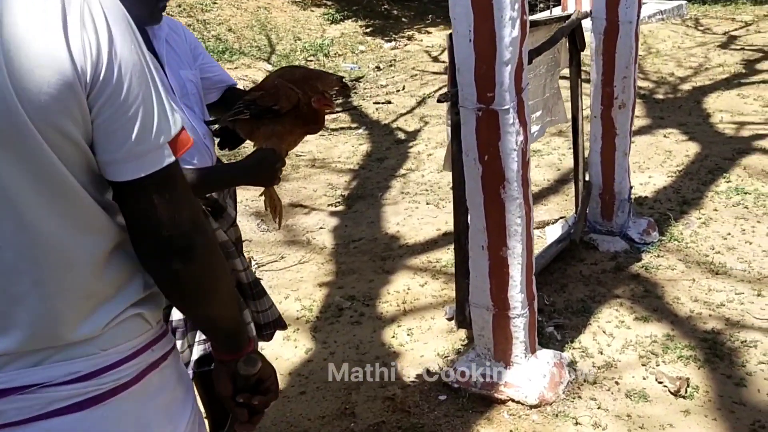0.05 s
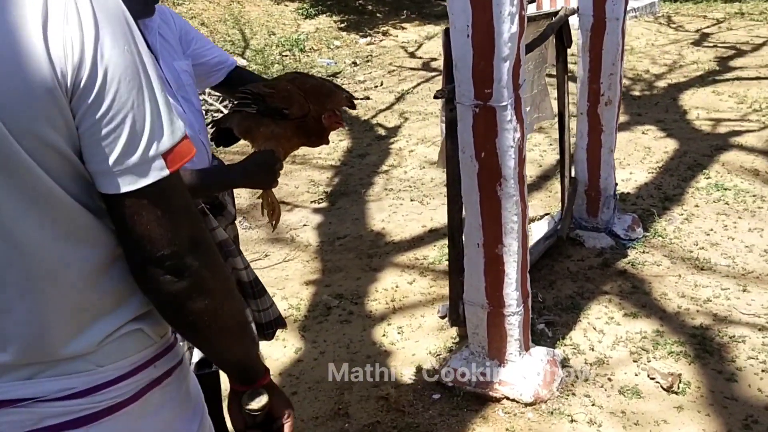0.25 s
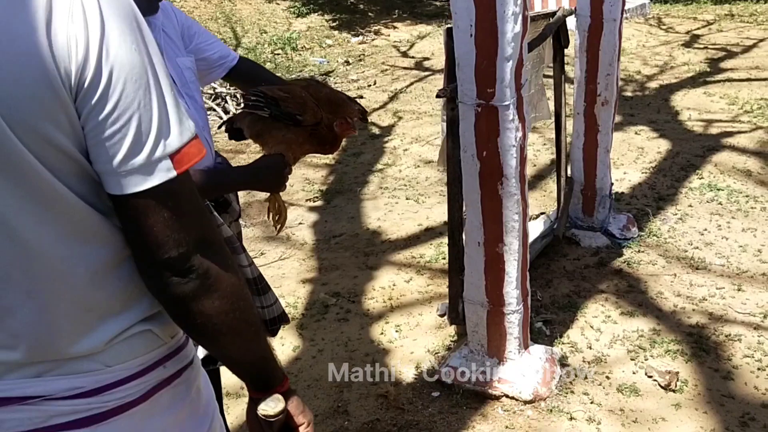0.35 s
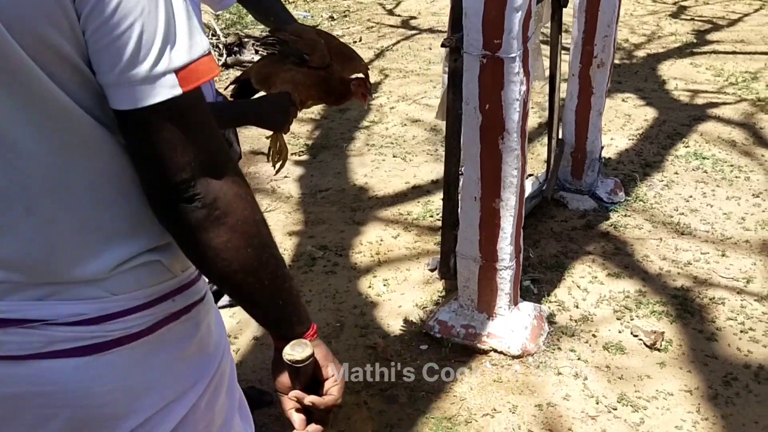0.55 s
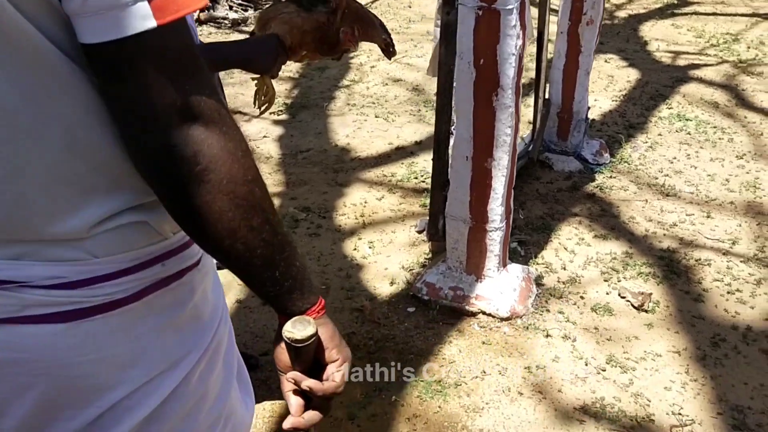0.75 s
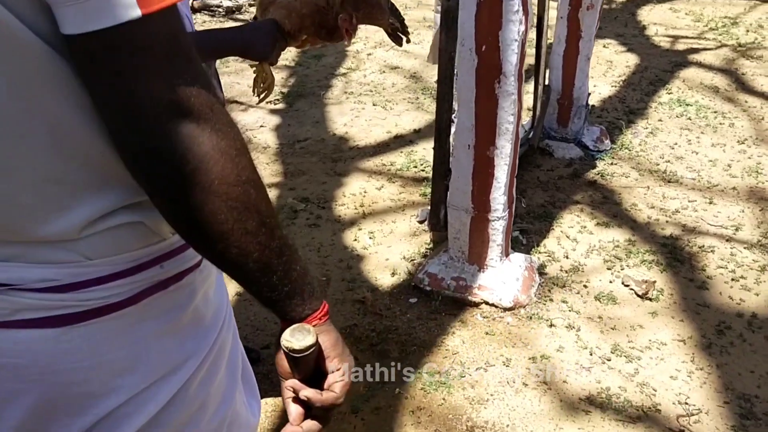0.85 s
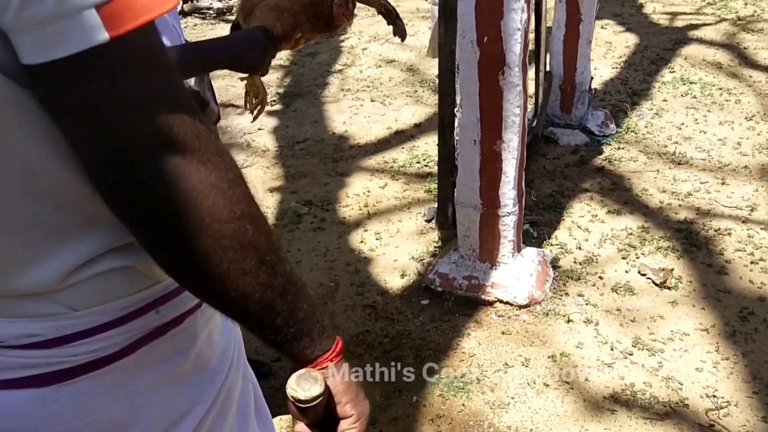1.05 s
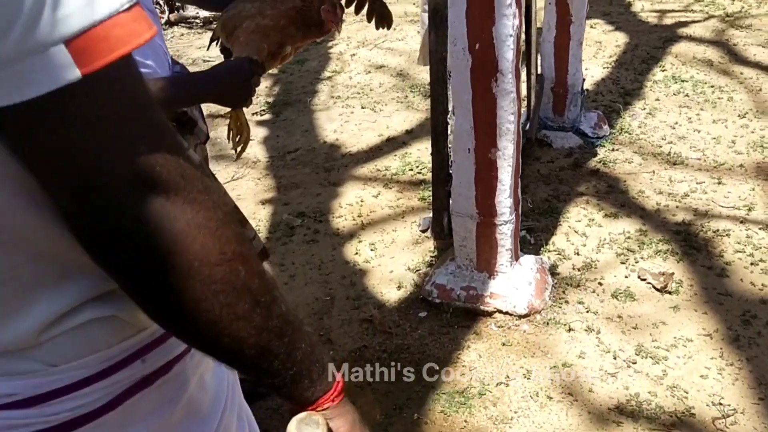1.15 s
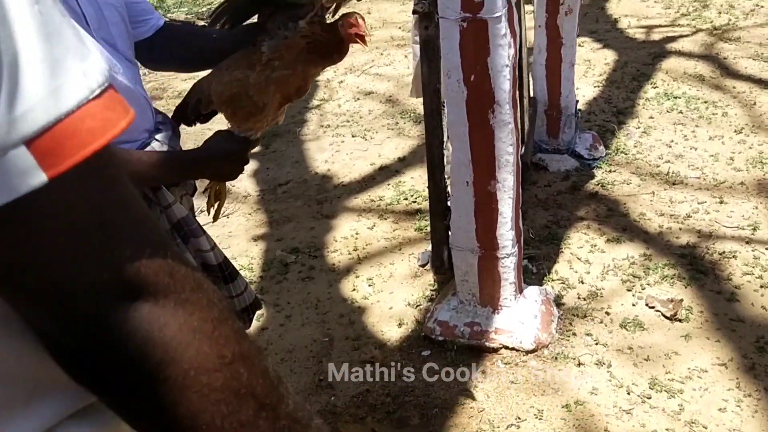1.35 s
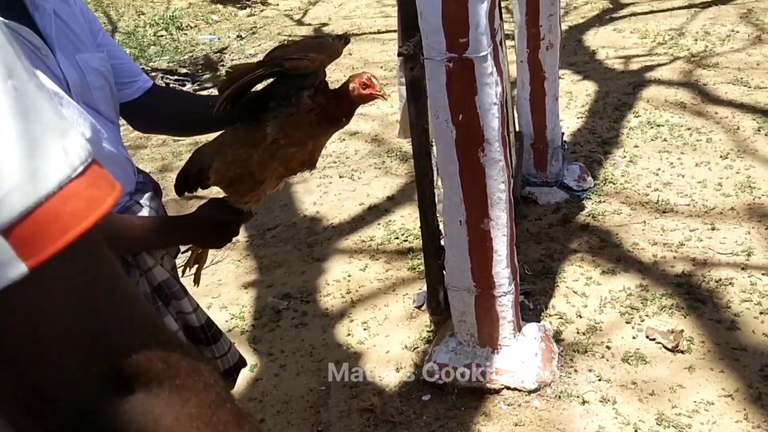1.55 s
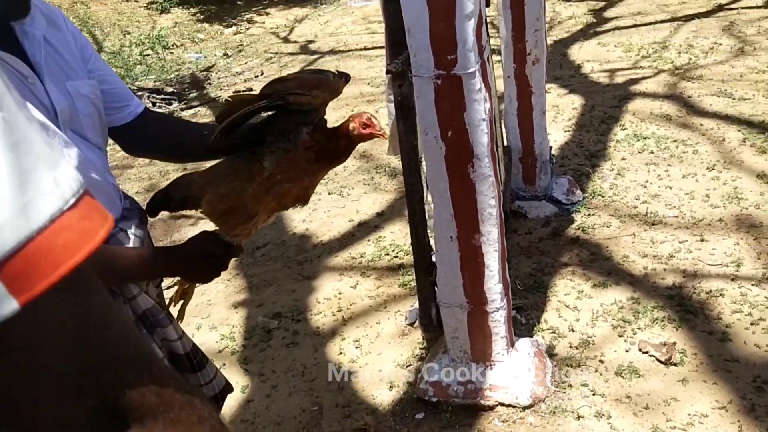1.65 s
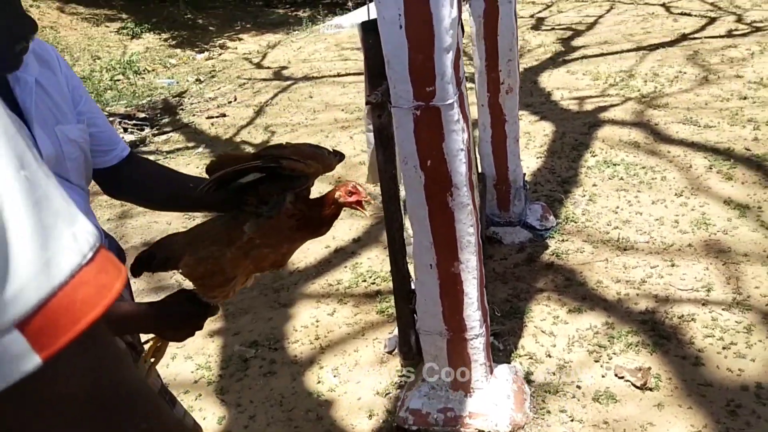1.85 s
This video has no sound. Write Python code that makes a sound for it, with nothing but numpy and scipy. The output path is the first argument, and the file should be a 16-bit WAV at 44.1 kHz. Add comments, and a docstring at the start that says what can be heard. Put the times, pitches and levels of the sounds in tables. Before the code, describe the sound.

A hen squawks loudly four times in quick succession, each harsh squeal dropping into a lower croak, then starts a fifth. She is close by in a quiet yard with a slight echo, and a faint rooster sounds far off.

```python
"""A hen squawking in a yard.

Held by the legs, a hen squawks four times and starts a fifth. The two sides of her syrinx beat
against each other in a harsh squeal, then fall into one lower croak as the beak closes.
Walls and trees return a faint echo over quiet outdoor air; a far rooster holds a note in the last pause."""
import sys
import numpy as np
from scipy import signal
from scipy.fft import rfft, irfft, next_fast_len
from scipy.io import wavfile
from scipy.ndimage import uniform_filter1d

SR = 44100
rng = np.random.default_rng(int(sys.argv[2]) if len(sys.argv) > 2 else 0)


def dump(signal):
    """Clip the signal to [-1, 1] and save it as 16-bit WAV at the path in sys.argv[1]."""
    limited = np.clip(np.atleast_2d(signal).T, -1, 1)
    pcm = np.round(limited * 32767).astype(np.int16)
    wavfile.write(sys.argv[1], SR, pcm)


N = 83790
BAND_EDGE_HZ = 15500


def amp(db):
    """Amplitude ratio of a level in decibels."""
    return 10 ** (np.asarray(db) / 20)


def unit_rms(x):
    """Normalisation to an rms of 1."""
    return x / np.sqrt(np.mean(x ** 2) + 1e-20)


def steadied(x):
    """Division by the running rms, which flattens the envelope."""
    return x / np.sqrt(abs(uniform_filter1d(x ** 2, size=800)) + 1e-12)


def at_hz(points, hz):
    """Interpolation on a logarithmic frequency axis."""
    f, value = np.transpose(points)
    return np.interp(np.log(hz + 1), np.log(f + 1), value)


def follow(rows, at):
    """Linear interpolation of a table's other columns along its first."""
    axis, *columns = np.transpose(rows)
    return [np.interp(at, axis, column) for column in columns]


def filtered(x, gain):
    """Linear filtering: the spectrum is multiplied by gain(f)."""
    size = next_fast_len(x.shape[-1] + 4096)
    return irfft(rfft(x, size) * gain(np.fft.rfftfreq(size, 1 / SR)), size)[..., :x.shape[-1]]


def coloured(x, points):
    """Spectral shaping by points of f/Hz, gain/dB."""
    return filtered(x, lambda f: amp(at_hz(points, f)))


def wander(size, hz):
    """Random fluctuation of rms 1, mostly slower than hz."""
    noise = rng.standard_normal(size)
    return unit_rms(filtered(noise, lambda f: 1 / (1 + (f / hz) ** 2) ** 2 * f / (f + hz / 10)))


def add(mix, start_s, sound):
    """Superposition of a sound on the mix."""
    part = mix[max(round(start_s * SR), 0):][:len(sound)]
    part += sound[:len(part)]


def resonate(x, hz, width_hz):
    """A damped resonator of unit peak gain whose centre frequency may glide."""
    carrier = np.exp(2j * np.pi * np.cumsum(hz * np.ones(len(x))) / SR)
    pole = np.exp(-np.pi * width_hz / SR)
    return 2 * (carrier * signal.lfilter([1 - pole], [1, -pole], x / carrier)).real


def outdoor_air(correlation=0.55):
    """Ambient noise, partly coherent between the channels, drifts slowly in level."""
    # background spectrum: f/Hz, relative density level/dB
    spectrum = [(20, -17), (85, 2), (300, -2), (650, 5), (4200, 0.5), (6000, -14.5), (15000, -19)]
    left, independent = coloured(rng.standard_normal((2, N)), spectrum)
    right = correlation * left + np.sqrt(1 - correlation ** 2) * independent
    return amp(-53 + 1.27 * wander(N, 2.5)) * unit_rms(np.array([left, right]))


def reverberation(x, t60_points):
    """Convolution with sparse random reflections; each band decays exponentially at its own rate."""
    taps = rng.standard_normal((2, SR)) * (rng.random((2, SR)) < .1)
    taps *= np.arange(SR) > SR // 400  # the first reflection takes 2.5 ms
    hz, t, bands = signal.stft(taps, SR, nperseg=256)
    decay = amp(-60 * t / at_hz(t60_points, hz)[:, None])
    response = signal.istft(bands * decay, SR, nperseg=256)[1]
    return signal.fftconvolve(x[None], unit_rms(response) / np.sqrt(response.shape[1]), axes=1)


def yard_echo(x):
    """Early reflections off ground and posts precede the faint reverberation from walls and trees."""
    # reverberation time: f/Hz, T60/s
    decay_times = [(300, .6), (1800, .87), (15000, .4)]
    # colour of the late echo: f/Hz, relative gain/dB
    colour = [(200, -11), (700, -2), (3500, -3), (6000, 5.5)]
    early = filtered(reverberation(x, [(1, .07)]), lambda f: f / np.hypot(f, 700))
    late = coloured(reverberation(x, decay_times), colour)
    return amp(-5) * early + amp(-24) * late


def membrane(phase, hz, tilt, count, offset=0):
    """Periodic vibration: harmonic k has amplitude k ** -tilt and is shifted in phase by offset."""
    return unit_rms(sum(k ** -tilt * (k * hz < BAND_EDGE_HZ) * np.cos(k * phase + offset)
                        for k in range(1, count + 1)))


def squeal(low_phase, high_phase, high_hz, coupling, rasp, throat):
    """Nonlinear coupling adds combination tones to the high side; the throat resonance filters them."""
    # spectral envelope: f/Hz, relative gain/dB
    envelope = [(100, -57), (500, -44), (720, 3), (1000, 10), (1350, 1), (1900, 9), (2250, 4.5),
                (2700, 1.5), (3400, 13.5), (3750, 6), (4200, 4), (4900, -7), (5900, -19.5), (7100, -11.5),
                (9500, -24.5), (12000, -28.5), (15000, -24.5)]
    tone, difference_tones, sum_tones = (
        membrane(high_phase, high_hz, tilt=0.061, count=12, offset=shift)
        for shift in (0, -low_phase, low_phase))
    source = coloured(tone + coupling * (1.33 * difference_tones + 0.36 * sum_tones) + rasp, envelope)
    resonant = resonate(resonate(source, *throat), *throat)
    return steadied(resonant + amp(-12) * source)


def croak(pulses, beak_hz, ring_db, opening):
    """Source and filter: the low side's pulses excite the beak resonance and grow dull as it shuts."""
    # spectral envelopes with the beak open and shut: f/Hz, relative gain/dB
    open_envelope = [(100, -53), (430, -74), (620, -12), (850, 5.5), (1250, -6.5), (1850, -1.5),
                     (2300, -1.5), (3600, -0.5), (4200, -3.5), (4800, -5.5), (5900, -24), (7100, -15),
                     (9500, -25), (12000, -34.5), (15000, -32)]
    shut_envelope = [(100, -63), (280, -7.5), (480, -13.5), (950, -2), (1500, 6.5), (2300, -14.5),
                     (4400, -12), (5900, -41), (7300, -30), (15000, -50)]
    ringing = pulses + amp(ring_db) * resonate(pulses, beak_hz, width_hz=390)
    bright, dull = coloured(ringing, open_envelope), coloured(ringing, shut_envelope)
    return steadied(opening * bright + (1 - opening) * dull)


def squawk(effort, syrinx, beak, throat):
    """Biphonation: two membranes vibrate at separate pitches, the high squealing, the low croaking."""
    jitter_hz, tremor_hz = 210, 108
    beak_shut_hz, beak_open_hz, low_cut_hz = 1108, 1828, 397
    t = np.arange(effort[0][0], effort[-1][0], 1 / SR)
    size = len(t)
    level_db, = follow(effort, t)
    low_hz, high_hz, high_share, rough = follow(syrinx, t)
    high_share, rough = np.clip(high_share, 0, .995), np.clip(rough, 0, 1)
    low_share = 1 - high_share
    beak_hz, ring_db = follow(beak, t)
    opening = np.clip((beak_hz - beak_shut_hz) / (beak_open_hz - beak_shut_hz), 0, 1)

    # Roughness sets pitch jitter, amplitude shimmer and air noise pulsed by the low side.
    low_phase = 2 * np.pi * np.cumsum(low_hz * (1 + 0.115 * rough * wander(size, jitter_hz))) / SR
    high_phase = 2 * np.pi * np.cumsum(high_hz * (1 + 0.058 * rough * wander(size, jitter_hz))) / SR
    shimmer = 1 + .35 * rough * wander(size, 2 * jitter_hz)
    rasp = amp(-6) * rough * unit_rms((1 + np.cos(low_phase)) * rng.standard_normal(size))

    coupling = np.sqrt(low_share) * shimmer
    high_voice = squeal(low_phase, high_phase, high_hz, coupling, rasp, throat)
    pulses = shimmer * membrane(low_phase, low_hz, tilt=0.083, count=28) + rasp
    low_voice = croak(pulses, beak_hz, ring_db, opening)
    voice = steadied(high_share * high_voice + low_share ** 1.72 * low_voice)
    tremor_db = (1.4 + 1.5 * (1 - opening)) * rough * wander(size, tremor_hz)
    voice *= amp(level_db - low_share + tremor_db)  # the croak is 1 dB softer than the squeal

    # The low side's fundamental saturates as effort grows.
    fundamental_gain = np.sqrt(low_share * opening) / (amp(-level_db - 4.5) + amp(30))
    flutter = 1 + 0.97 * rough * wander(size, tremor_hz)
    voice += fundamental_gain * flutter * np.sin(low_phase)
    # A small body radiates little bass.
    return amp(2.5) * filtered(voice, lambda f: f ** 4 / (f ** 4 + low_cut_hz ** 4))


def direct_path(x):
    """The direct sound reaches two receivers with level and phase differences that vary with frequency."""
    # level difference: f/Hz, left minus right/dB
    balance = [(300, 2), (700, -6), (1000, -1), (1300, -5), (1850, -5), (2400, 4), (3100, 12), (3550, 5),
               (4100, 11), (5200, 3), (6400, -14.5), (10000, -16), (13000, 0.5)]
    # phase difference: f/Hz, left minus right/rad
    lead = [(0, 0), (900, -.6), (1350, -2.2), (2400, -.6), (3300, -3.6), (7500, -11.3), (16000, -25)]
    side = np.array([[.5], [-.5]])
    return filtered(x, lambda f: amp(side * at_hz(balance, f)) * np.exp(1j * side * follow(lead, f)[0]))


def far_rooster():
    """A held, slightly wavering harmonic series, weighted by the formants of the throat."""
    # held note: t/s, f/Hz, level/dB
    note = [(1.561, 632.4, -47), (1.669, 643.5, -50), (1.85, 626, -54)]
    # throat response: f/Hz, relative gain/dB
    throat = [(640, -9), (1280, 5), (1920, -25), (2500, -3), (3850, -29), (5000, -35)]
    t = np.arange(note[0][0], note[-1][0], 1 / SR)
    hz, level_db = follow(note, t)
    phase = 2 * np.pi * np.cumsum(hz * (1 + 0.019 * wander(len(t), 150))) / SR
    tone = sum(amp(at_hz(throat, k * hz)) * np.cos(k * phase) for k in range(1, 8))
    out = np.zeros(N)
    add(out, t[0], amp(level_db) * unit_rms(tone))
    return out


def scene():
    """Superposition of the hen's direct and reflected sound, the rooster and the air."""
    # vocal effort in each of four squawks, then the start of the fifth: t/s, relative level/dB
    efforts = [
        [(0.122, -63), (0.127, -44.5), (0.136, -34), (0.15, -37.5), (0.2, -28.5), (0.255, -21.5),
         (0.294, -20.5), (0.309, -13), (0.326, -16.5), (0.388, -17), (0.41, -26), (0.436, -41.5)],
        [(0.537, -61), (0.544, -35), (0.571, -21), (0.643, -15.5), (0.735, -16), (0.77, -19.5), (0.806, -39)],
        [(0.912, -48), (0.922, -28), (0.964, -15), (1.07, -16), (1.125, -15), (1.145, -19.5), (1.162, -20),
         (1.184, -45)],
        [(1.302, -64), (1.307, -34), (1.319, -30), (1.328, -19), (1.45, -18), (1.492, -16), (1.537, -16.5),
         (1.553, -22.5), (1.572, -52.5)],
    ]
    fifth_effort = [(1.866, -51.5), (1.9, -29)]
    # syrinx, per squawk: t/s, low side f/Hz, high side f/Hz, high side's share, roughness
    syrinxes = [
        [(.124, 268.8, 1175, 0.43, 1), (.134, 741, 1200, 0.23, 1.09), (.15, 785.2, 1188, 0.12, 0.3),
         (.17, 790.7, 1159, 0.1, 0.2), (.2, 771.7, 1268, 0.4, 0.56), (.24, 746.3, 1299, 0.53, 0.67),
         (.264, 641.4, 1286, 1, 0.09), (.287, 654.7, 1305, 1, 0.07), (.309, 689.8, 1385, 0.94, 0.1),
         (.323, 694, 1388, 0.58, 0.82), (.341, 608.8, 1245, 0.3, 0.15), (.375, 576.7, 1137, 0.31, 0.01),
         (.392, 593, 1123, 0.09, 0.48), (.43, 263, 932, 0.17, 0.46)],
        [(.546, 260, 1302, 0.35, 0.97), (.557, 727, 1330, 0.25, 0.73), (.61, 794, 1371, 0.69, 0.63),
         (.64, 800, 1365, 0.75, 0.34), (.685, 837.4, 1421, 0.66, 0.42), (.705, 712, 1382, 0.62, 0.94),
         (.717, 600.6, 1227, 0.1, 0.16), (.729, 613.7, 1220, 0.43, 0.04), (.742, 647, 1271, 0, 0.21),
         (.765, 579, 1149, 0.18, 0.69), (.8, 428, 880, 0.1, 0.37)],
        [(.916, 270.1, 1310, 0.38, 0.8), (.926, 719.2, 1340, .25, 0.92), (.948, 711.7, 1394, 0.52, 0.91),
         (.968, 676.2, 1316, 0.74, 0.31), (1.02, 691, 1335, 0.85, 0.29), (1.068, 684, 1378, 0.96, 0.61),
         (1.086, 705.5, 1365, 0.31, 0.75), (1.102, 586.3, 1182, 0.38, 0.11), (1.122, 624.3, 1222, 0.23, 0.28),
         (1.142, 582.7, 1420, 0.2, 0.56), (1.175, 423, 970, 0, 0.68)],
        [(1.307, 269.3, 1248, 0, 1), (1.317, 739, 1260, 0.1, .9), (1.33, 738, 1278, 0.47, 0.55),
         (1.37, 737.5, 1320, 0.55, 0.68), (1.42, 763.2, 1370, 0.64, 0.66), (1.45, 688.2, 1400, 0.68, 0.48),
         (1.474, 679.7, 1300, 0.18, .55), (1.488, 617, 1210, 0.12, 0.26), (1.502, 599, 1217, 0, 0.25),
         (1.514, 649.7, 1315, 0.02, 0.6), (1.534, 647.4, 1200, 0, 0.82), (1.56, 401.7, 957, 0.26, 0.74)],
        [(1.864, 453.5, 1255, 0.24, 0.86), (1.9, 745, 1262, 0.38, 0.69)],
    ]
    # beak resonance, per squawk: t/s, f/Hz, gain/dB
    beaks = [
        [(.12, 1516, -0.5), (.375, 1900, 2.5), (.41, 1040, -15)],
        [(.54, 1420, -16.5), (.735, 1907, 4), (.78, 1070, 2)],
        [(.91, 1520, -1.5), (1.115, 1860, 6), (1.16, 1150, 3.5)],
        [(1.3, 1470, -7), (1.487, 2104, 5), (1.535, 1287, 9)],
        [(1.87, 1700, 4)],
    ]
    # throat resonance, one row per squawk: f/Hz, bandwidth/Hz
    throats = [(2835, 520), (2823, 840), (3032, 860), (2620, 610), (2630, 650)]
    hen = np.zeros(N)
    for effort, syrinx, beak, throat in zip(list(efforts) + [fifth_effort], syrinxes, beaks, throats):
        add(hen, effort[0][0], squawk(effort, syrinx, beak, throat))
    out = direct_path(hen) + yard_echo(hen)[:, :N] + far_rooster() + outdoor_air()
    # The yard still rings at the start from a squawk that ended 0.17 s before.
    earlier = squawk(efforts[1], syrinxes[1], beaks[1], throats[1])
    for channel, tail in zip(out, yard_echo(earlier)):
        add(channel, 0, tail[len(earlier) + round(0.17 * SR):])
    return out


def record(dry, ceiling=.95):
    """Soft saturation rounds the highest peaks; a low-pass filter limits the band."""
    rounded = dry / (1 + (dry / ceiling) ** 12) ** (1 / 12)
    low_pass = signal.firwin(511, BAND_EDGE_HZ, window=("kaiser", 9), fs=SR)
    return signal.oaconvolve(rounded, low_pass[None], "same")


dry = scene()
out = record(dry)
dump(out)
```